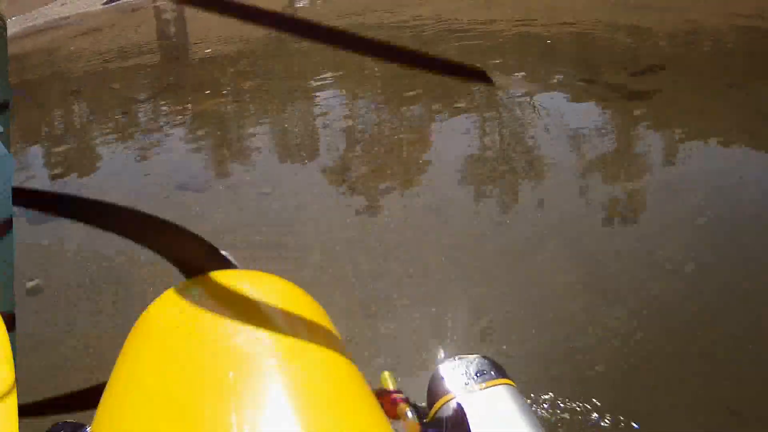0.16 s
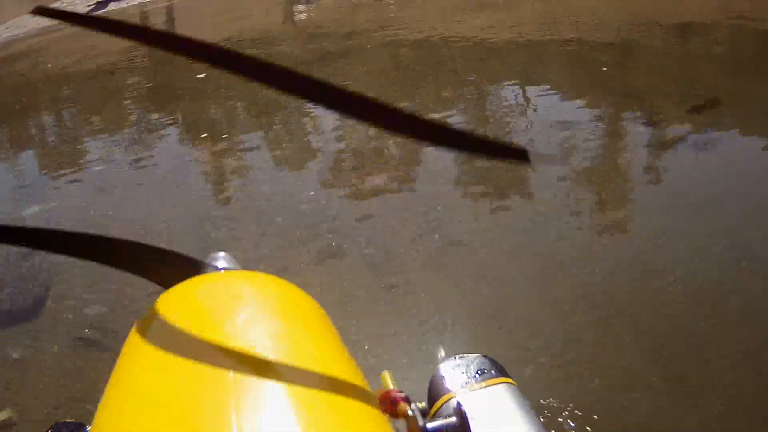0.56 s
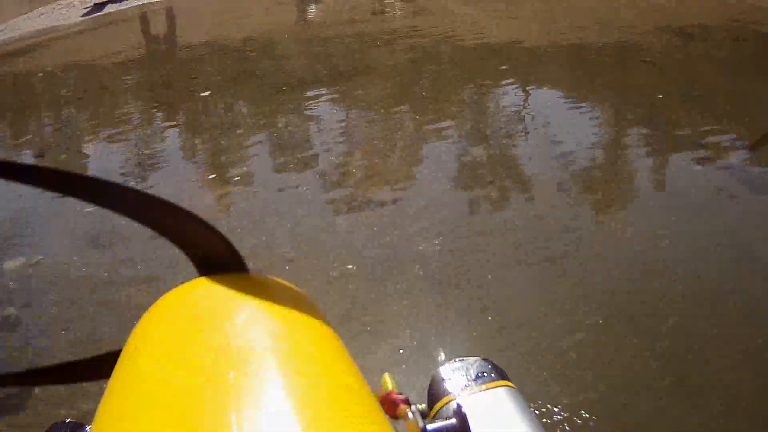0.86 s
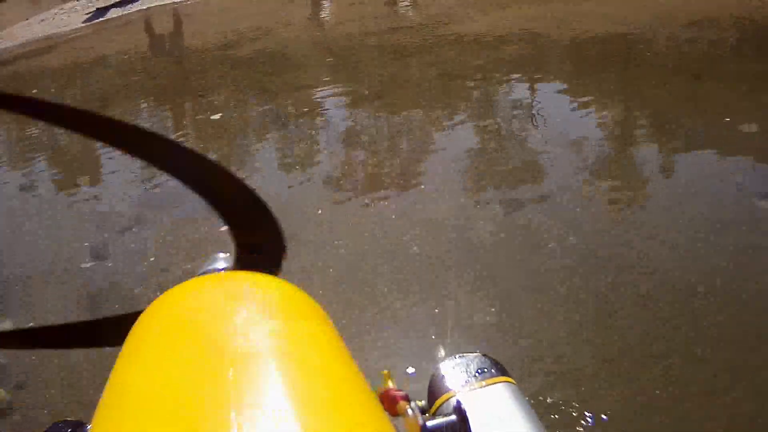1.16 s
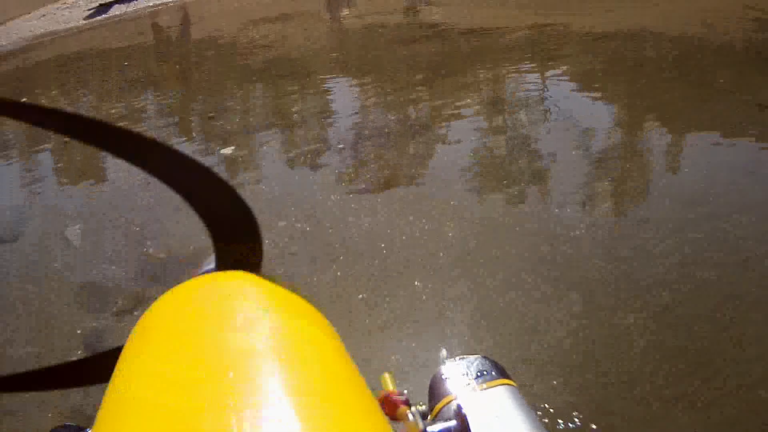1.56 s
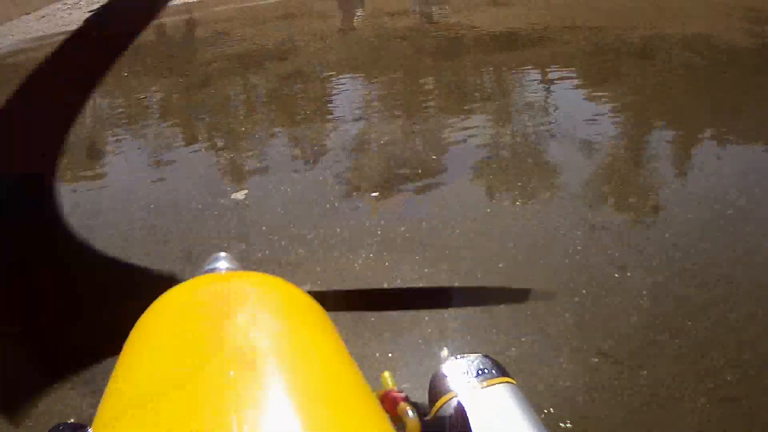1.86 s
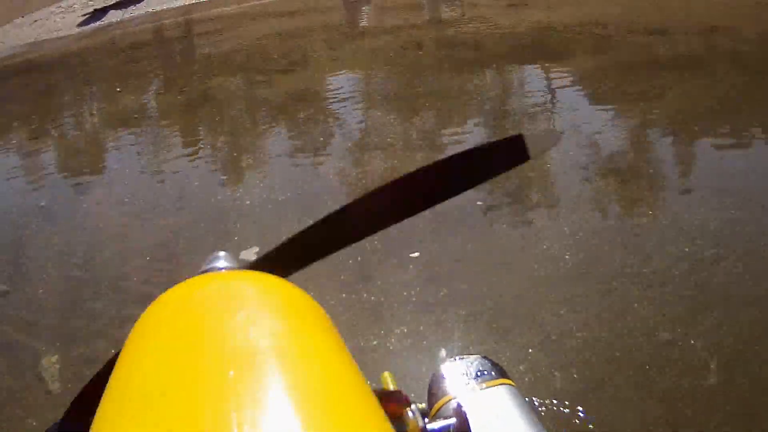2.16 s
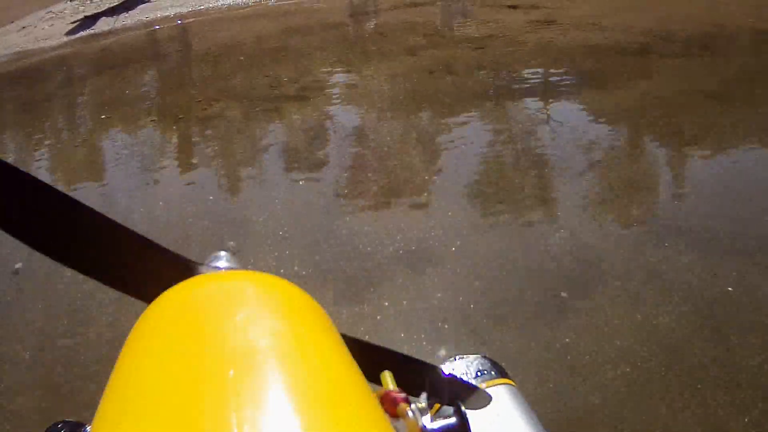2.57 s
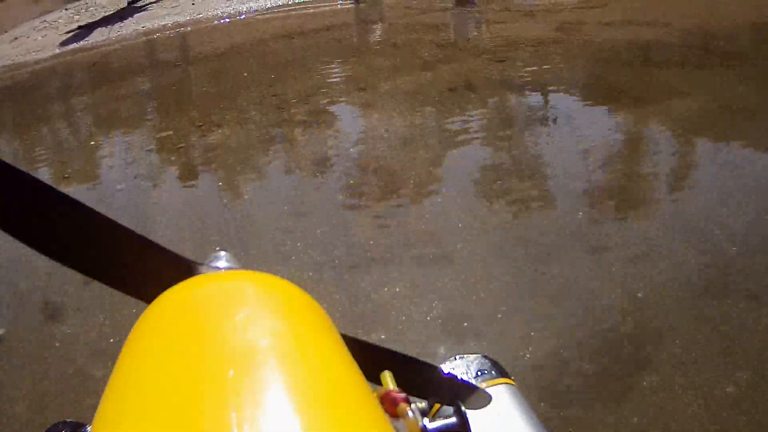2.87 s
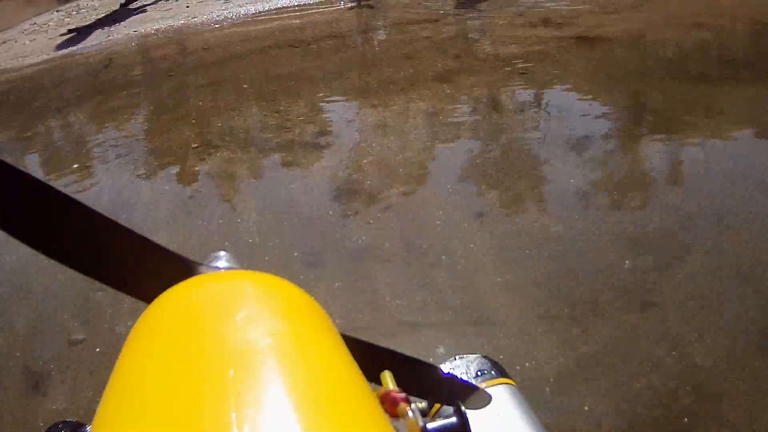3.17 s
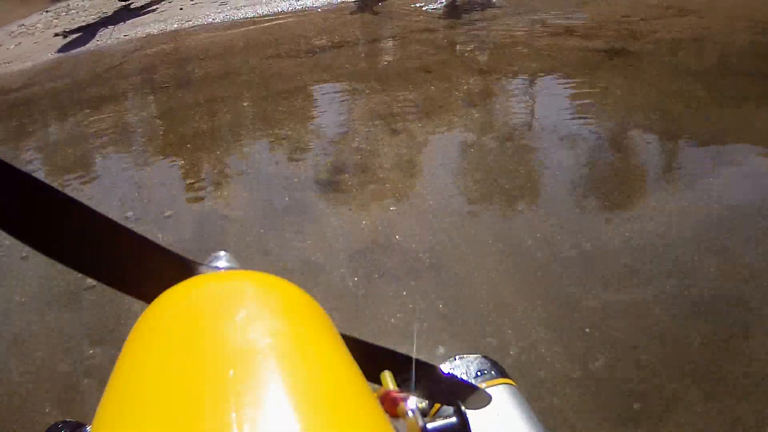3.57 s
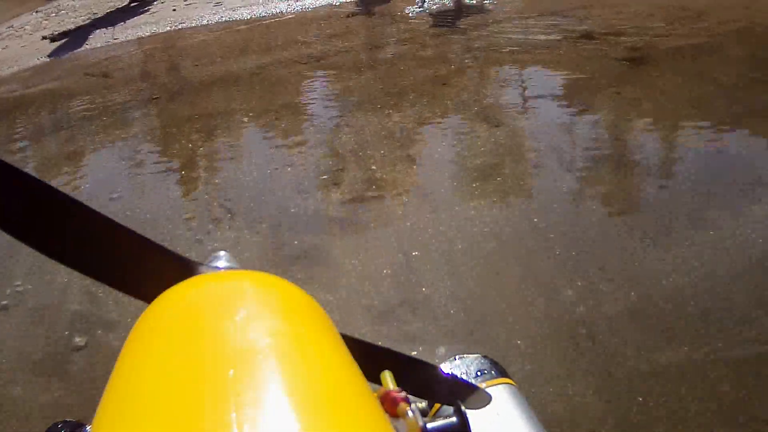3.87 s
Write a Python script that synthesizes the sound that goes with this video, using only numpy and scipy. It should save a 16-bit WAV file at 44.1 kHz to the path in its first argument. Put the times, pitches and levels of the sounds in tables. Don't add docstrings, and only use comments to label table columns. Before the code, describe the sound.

A small model aircraft engine runs loudly until about 0.55 s, a deep, slightly distorted buzz with dense rattling and crackle felt through the mount. It cuts and coasts with heavy uneven thumps, hollow exhaust puffs, knocks and metal ticks, weakening until 1.85 s. The airframe hums low near 2 s, the propeller rocks softly until 2.5 s, then only faint steady hiss and lake quiet remain to 4 s.

```python
import sys
import numpy as np
from scipy import signal
from scipy.fft import rfft, irfft
from scipy.io import wavfile
from scipy.ndimage import uniform_filter1d

SR = 44100
rng = np.random.default_rng(int(sys.argv[2]) if len(sys.argv) > 2 else 0)


def transcribe(signal):
    frames = np.atleast_2d(signal).T
    limited = np.clip(frames, -1, 1)
    pcm = np.round(limited * 32767).astype(np.int16)
    wavfile.write(sys.argv[1], SR, pcm)


def makeup_ratio(level_db):
    decades = np.asarray(level_db, float) / 20
    return 10 ** decades


N = 176400
t = np.arange(N) / SR
SHAKE_HZ, CUT_S = 54.5, 0.554


def unit(x):
    return x / np.sqrt(np.mean(x ** 2))


def band(x, hz, width_hz):
    return signal.lfilter(*signal.iirpeak(hz, hz / width_hz, fs=SR), x)


def walk(rate):
    k = int(SR / rate)
    steps = np.repeat(rng.standard_normal(N // k + 1), k)
    return unit(uniform_filter1d(uniform_filter1d(steps, k), k)[:N])


def curve(rows):
    return makeup_ratio(np.interp(t, *np.array(rows).T))


def clicks(per_s, scatter_db):
    chosen = rng.random(N) < per_s / SR
    sign = rng.choice([-1, 1], N)
    return unit(chosen * sign * makeup_ratio(scatter_db * np.minimum(rng.exponential(size=N), 4)))


def strike(s, db, rise_s, t60):
    return np.exp(np.minimum(t - s, 0) / rise_s) * makeup_ratio(db - 60 * np.maximum(t - s, 0) / t60)


def rings(rows, t60, gain_db):
    out = np.zeros(N)
    for s, db, hz in rows:
        u = np.maximum(t - s, 0)
        fade = makeup_ratio(db + gain_db - 60 * np.minimum(u, .2) / t60) * (u < .2)
        out += fade * np.sin(2 * np.pi * hz * u) * np.minimum(u / .0014, 1)
    return out


def running():
    return np.clip((CUT_S - t) / 0.0013, 0, 1)


# [multiple of the turn, level/dB]
SHAKE_PARTIALS = [(1, -5.5), (2, -34), (3, -23), (9, -35.5), (11, -46)]
# [t/s, level/dB, lead/ms]
MOUNT_SWING = [(0, -1, -.9), (.07, 1, .8), (.2, 0, -3.7), (.26, -2, -1.5), (.3, 1, 0), (.39, 1, .6),
               (.47, 2, -1.8), (.51, 2.5, -2), (.55, -1, -2.8)]


def shake():
    phase_s, jitter_s, wobble_db = .0068, 0.00025, 0.8
    turn = 2 * np.pi * SHAKE_HZ * (t - phase_s + jitter_s * walk(25))
    s, level_db, lead_ms = np.array(MOUNT_SWING).T
    lead = 2 * np.pi * SHAKE_HZ * uniform_filter1d(np.interp(t, s, lead_ms), size=900) / 1000
    gains = [np.sqrt(2) * makeup_ratio(db + wobble_db * walk(30)) for k, db in SHAKE_PARTIALS]
    swing = gains[0] * makeup_ratio(np.interp(t, s, level_db)) * np.cos(turn + lead)
    upper = sum(g * np.cos(k * turn) for g, (k, db) in zip(gains[1:], SHAKE_PARTIALS[1:]))
    return running() * (swing + upper)


# [t/s, level/dB]
AIRFRAME_SWAY = [(0, -19), (.54, -19), (.58, -25), (1.17, -22), (1.27, -19), (1.36, -24), (1.5, -22),
                 (1.85, -24), (2.0, -29), (2.1, -42), (2.3, -46), (2.45, -56), (2.55, -56), (3.0, -72),
                 (4, -74)]
# [t/s, level/dB]
AIRFRAME_RING = [
    (1.86, -45),
    (1.91, -23),
    (2.0, -20),
    (2.08, -32),
    (2.33, -38.5),
    (2.4, -48.5),
    (2.55, -46.5),
    (2.6, -55),
    (2.9, -59),
    (3.05, -71),
]


def sway():
    def mode(hz, width_hz):
        return unit(band(band(rng.standard_normal(N), hz, width_hz), hz, 2 * width_hz))

    loose = mode(58.56, 20) + makeup_ratio(1.5) * mode(29, 16) + makeup_ratio(-6.5) * mode(107, 60)
    ring = signal.hilbert(mode(65, 9))
    steady_ring = ring.real / (.5 + abs(ring)) * 2
    return loose * curve(AIRFRAME_SWAY) + steady_ring * curve(AIRFRAME_RING)


# [f/Hz, level/dB per Hz]
HISS_SPECTRUM = [(25, -7), (62, -4.5), (170, -7.5), (500, -15.5), (1500, -23), (5000, -29.5), (9000, -32),
                 (14000, -31.5)]
# [f/Hz, level/dB]
CAMERA_WHINE = [(3705, -83), (11999, -89)]


def quiet():
    hz, level_db = np.array(HISS_SPECTRUM).T
    f = np.arange(N // 2 + 1) * SR / N + 1
    colour = makeup_ratio(np.interp(np.log(f), np.log(hz), level_db))
    noise = irfft(rfft(rng.standard_normal(N)) * colour, N)
    whine = 0
    for hz, db in CAMERA_WHINE:
        whine = whine + np.sqrt(2) * makeup_ratio(db) * np.sin(2 * np.pi * hz * t + .6 * walk(150) + 1.5 * walk(40))
    return unit(noise) * makeup_ratio(-65) + whine + makeup_ratio(-62)


def crackle():
    fizz = .5 * rng.standard_normal(N) * makeup_ratio(3.0 * walk(240))
    sparks = running() * (clicks(690, 4.3) + fizz)
    return makeup_ratio(-47.5) * band(band(sparks, 6400, 8000), 4300, 10000)


# [t/s, level/dB, t60/s]
RATTLE_BURSTS = [(0.0004, -19.5, 0.082), (0.5704, -22, 0.043), (0.5884, -23, 0.04), (0.6158, -23.5, 0.12),
                 (0.6564, -16, 0.13), (0.694, -21, 0.077), (0.715, -32, 0.21), (0.7892, -26.5, 0.023),
                 (0.8006, -29, 0.044), (0.83, -28.5, 0.055), (0.8714, -18.5, 0.12), (0.9323, -24.5, 0.028),
                 (1.0073, -31, 0.13), (1.0261, -24, 0.027), (1.104, -27.5, 0.084), (1.119, -31, 0.032),
                 (1.212, -40.5, 0.074), (1.2519, -28.5, 0.08), (1.294, -43.5, 0.055), (1.474, -35.5, 0.038),
                 (1.5234, -46, 0.044), (1.6317, -42, 0.04), (1.6746, -56, 0.024), (1.7225, -46, 0.05),
                 (1.8073, -52, 0.049), (1.8322, -47.5, 0.048), (1.8497, -53.5, 0.072), (1.922, -62, 0.046),
                 (2.011, -46.5, 0.045), (2.1181, -51, 0.034), (2.2603, -67, 0.047)]
# [t/s, level/dB, f/Hz]
RUN_KNOCKS = [(0.0433, -22, 1370), (0.0578, -11, 1470), (0.0832, -26, 1440), (0.0957, -19.5, 1150),
              (0.1191, -22.5, 923), (0.1376, -17, 1100), (0.1506, -19.5, 1000), (0.1775, -12.5, 1230),
              (0.2154, -16, 1440), (0.2498, -21.5, 902), (0.2688, -17, 920), (0.3022, -30, 977),
              (0.3376, -18.5, 902), (0.3606, -28, 980), (0.374, -22, 980), (0.3935, -26, 1006),
              (0.41, -22.5, 1060), (0.4299, -22.5, 1280), (0.4494, -22.5, 1180), (0.4673, -24, 1140),
              (0.4858, -20, 1180), (0.5252, -17.5, 1150)]
# [t/s, level/dB, f/Hz]
COAST_IMPACTS = [(0.5682, -28.5, 1190), (0.5757, -22.5, 1100), (0.5912, -27, 1160), (0.6161, -21, 1200),
                 (0.654, -8.5, 1454), (0.6919, -21, 1080), (0.7158, -28.5, 1250), (0.7997, -24, 1020),
                 (0.871, -16, 1163), (0.8839, -27, 1198), (0.8945, -24, 1170), (0.9319, -28, 1180),
                 (1.0072, -32.5, 1200), (1.0257, -27, 1230), (1.1175, -24, 1250), (1.2716, -33, 1000),
                 (1.6809, -33.5, 990), (1.8092, -42, 1100), (1.8495, -39.5, 1050), (2.0146, -46, 1130),
                 (2.2595, -45.5, 1280)]
# [f/Hz, width/Hz, level/dB]
CASE_MODES = [(710, 500, -3), (1168, 240, 1.5), (1420, 250, -0.5), (2160, 830, -6), (2870, 660, -6),
              (3770, 200, -4), (4400, 600, -17), (6600, 9000, -39.5)]


def rattle(motion):
    cycle = (.5 + .5 * np.cos(2 * np.pi * SHAKE_HZ * (t - .004))) ** 1.5
    env = running() * makeup_ratio(-36.5 + 1.0 * walk(78)) * (.55 + cycle)
    hits, bursts = np.zeros(N), 0
    knocks = list(RUN_KNOCKS) + list(COAST_IMPACTS)
    for s, db, hz in knocks:
        env = env + strike(s, db - 15.5, rise_s=0.0014, t60=.03)
        hits[int(s * SR)] = makeup_ratio(db + 7 - 4.0 * s)
    for s, db, t60 in RATTLE_BURSTS:
        u = t - s
        fall_db = 60 * (np.clip(u, 0, .3) / max(.6 * t60, .01)) ** 2
        bursts = bursts + np.exp(np.minimum(u, 0) / 0.005) * makeup_ratio(db - 15.5 - fall_db)
    dense = clicks(6000, 2.23)
    coarse = 0.37 * dense + 0.75 * clicks(900, 3.0)
    drive = 6 * makeup_ratio(0.95 * walk(250)) * (env * dense + bursts * coarse) + hits
    case = 0
    for k, (hz, width_hz, db) in enumerate(CASE_MODES):
        case = case + (-1) ** k * makeup_ratio(db) * band(drive, hz, width_hz)
    grain = band(band(band(dense[::-1], 560, 500), 700, 800), 700, 800)
    buzz = abs(motion) * unit(grain)
    return case + rings(knocks, t60=.02, gain_db=-2.5) + makeup_ratio(-34) * buzz


# [t/s, level/dB, f/Hz]
LINKAGE_TICKS = [(0.9627, -45, 3820), (1.0567, -46, 3830), (1.1488, -44, 3230), (1.4083, -46, 3940),
                 (1.4749, -47, 3330), (1.5145, -47, 3870), (1.5677, -49, 3800), (1.6316, -45.5, 3280),
                 (1.654, -57, 3820), (1.675, -50.5, 3870), (1.8012, -57, 3220), (1.8089, -57, 3300),
                 (1.841, -59, 3270), (1.898, -56.5, 4550), (1.9227, -47, 4050), (1.9824, -54, 3810),
                 (2.007, -50, 4100), (2.0406, -56, 3260), (2.1175, -53, 3320), (2.2198, -60, 3920)]


def ticks(motion):
    env = makeup_ratio(-54.5 + 1.5 * walk(60)) * abs(motion)
    for s, db, hz in LINKAGE_TICKS:
        env = env + strike(s, db - 16.5, rise_s=.002, t60=0.03)
    drive = env * clicks(4500, 1.8)
    metal = band(drive, 3800, 700) + 0.55 * band(drive, 3250, 240)
    return 5 * band(metal, 3700, 1400) + rings(LINKAGE_TICKS, t60=0.017, gain_db=-3.5)


# [t/s, level/dB]
COAST_PUFFS = [(0.582, -18.5), (0.635, -12.5), (0.676, -15.5), (0.717, -16), (0.763, -18), (0.81, -18),
               (0.859, -14.5), (0.899, -19.5), (0.941, -19), (0.986, -20), (1.034, -19.5), (1.078, -20),
               (1.125, -18), (1.177, -19), (1.229, -16), (1.276, -17.5), (1.33, -17.5), (1.384, -20),
               (1.406, -30), (1.442, -19.5), (1.466, -25), (1.494, -18), (1.544, -18.5), (1.6, -21),
               (1.624, -25.5), (1.656, -19), (1.68, -25), (1.705, -19.5), (1.765, -21.5), (1.806, -29.5),
               (1.83, -17), (1.852, -23), (1.887, -19.5), (1.928, -28.5), (1.966, -25.5)]
# [t/s, level/dB]
PROPELLER_ROCKS = [
    (2.006, -24.5),
    (2.122, -32),
    (2.177, -38),
    (2.213, -31),
    (2.238, -27.5),
    (2.354, -53),
    (2.416, -62),
    (2.47, -58.5),
    (2.522, -54.5),
    (2.555, -58),
]
# [f/Hz, level/dB, t60/s]
SILENCER_MODES = [(111, -6, 0.12), (160, -9.5, 0.17), (200, -8.5, 0.1), (240, -8, 0.13),
                  (292.5, -3.5, 0.11), (318.4, -4, 0.13), (352.6, -4.5, 0.098), (376.5, -7, 0.082),
                  (423.4, -11.5, 0.11), (474, -14, 0.09), (599, -13.5, 0.098), (719, -21.5, 0.057),
                  (914, -25.5, 0.06), (1250, -29.5, 0.05)]
# [t/s, level/dB, f/Hz]
SETTLING_PARTS = [
    (2.125, -48, 640),
    (2.34, -50, 131),
    (2.52, -43, 140),
    (2.555, -51, 129),
]


def puffs():
    firing = [(s, -20.5) for s in np.arange(.004, CUT_S, 1 / SHAKE_HZ)]
    rows = np.array(firing + list(COAST_PUFFS) + list(PROPELLER_ROCKS))
    u = np.arange(int(.25 * SR)) / SR
    chance = rng.standard_normal((len(rows), len(SILENCER_MODES), 4))
    out = np.zeros(N + len(u))
    for (s, db), puff_chance in zip(rows, chance):
        ring = 0
        for (hz, mode_db, t60), (level, pitch, phase, rise) in zip(SILENCER_MODES, puff_chance):
            tone = np.sin(2 * np.pi * hz * (1 + 0.038 * pitch) * u + 0.57 * phase)
            onset = 1 - np.exp(-(u / (0.0022 + hz / 500000 * abs(rise))) ** 2)
            ring = ring + makeup_ratio(mode_db + 2.2 * level) * tone * makeup_ratio(-60 * u / t60) * onset
        start = int(s * SR)
        out[start:start + len(u)] += makeup_ratio(db + 3.0) * ring / abs(ring).max()
    return out[:N] + rings(SETTLING_PARTS, t60=0.19, gain_db=-1.5)


# [t/s, level/dB, f/Hz]
COMPRESSION_THUMPS = [(0.585, -3, 76), (0.624, -4, 70), (0.635, -4.5, 80), (0.674, 0.5, 64),
                      (0.711, -2, 49), (0.756, -15, 79.4), (0.784, -7, 63), (0.8, -2.5, 80),
                      (0.837, -7.5, 55), (0.889, 2, 63.4), (0.933, -2, 54.7), (0.968, -11, 65.2),
                      (1.011, -16, 70), (1.025, -1, 66), (1.118, -3, 68), (1.211, -2.5, 52),
                      (1.238, -32.5, 57), (1.256, -6, 62), (1.274, -2, 58), (1.302, -8.5, 59.3),
                      (1.472, -7, 44.4), (1.503, -8, 58), (1.534, -6.5, 74), (1.575, -13, 62.2),
                      (1.633, -9.5, 46.6), (1.693, -15.5, 77), (1.737, -7, 57.5), (1.805, -7.5, 49.3)]
# [t/s, level/dB]
MOUNT_REBOUNDS = [(0.573, -13), (0.767, -8.5), (0.854, -8.5), (0.919, -18), (.952, -15.5), (1.063, -9),
                  (1.102, -14), (1.154, -11), (1.319, -10.5), (1.391, -11.5), (1.457, -19.5), (1.521, -9.5),
                  (1.658, -10), (1.679, -11), (1.718, -11), (1.831, -16.5)]


def thumps():
    rise_turns, fall_turns, rebound_hz = 0.46, 0.39, 66
    out = np.zeros(N)
    for s, db, hz in list(COMPRESSION_THUMPS) + [(s, db, rebound_hz) for s, db in MOUNT_REBOUNDS]:
        u = (t - s) * hz
        bell = np.exp(-.5 * (u / np.where(u < 0, rise_turns, fall_turns)) ** 2)
        crest = .17 * np.cos(2 * np.pi * 2.8 * u) * np.exp(-.5 * (u / 0.34) ** 2)
        out += makeup_ratio(db) * (np.cos(2 * np.pi * u) * bell + crest)
    return out


def scene():
    motion = shake() + sway() + thumps()
    return (quiet() + motion + crackle() + rattle(motion) + ticks(motion) + puffs())[None]


def top_cut(x):
    return signal.sosfilt(signal.butter(12, 14940, fs=SR, output="sos"), x)


def record(dry):
    ceiling = 1.1
    rounded = np.clip(ceiling * np.tanh(dry / ceiling), -1, 1)
    top = signal.butter(10, 14600, fs=SR, output="sos")
    mix = signal.sosfilt(top, rounded)
    return top_cut(mix)


dry = scene()
out = record(dry)
transcribe(out)
```